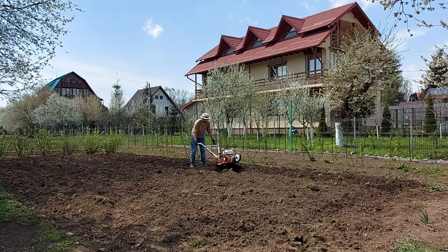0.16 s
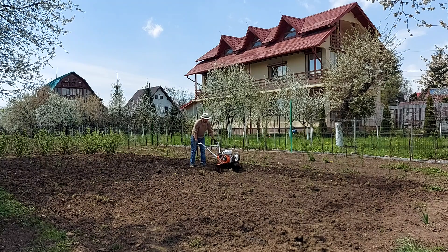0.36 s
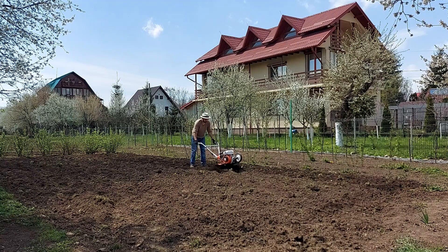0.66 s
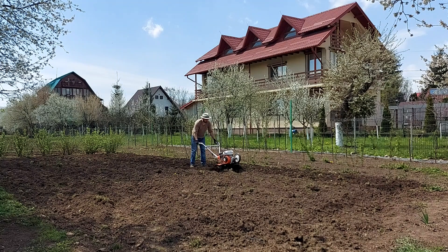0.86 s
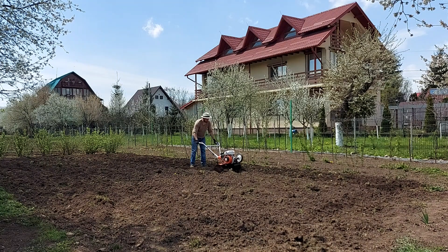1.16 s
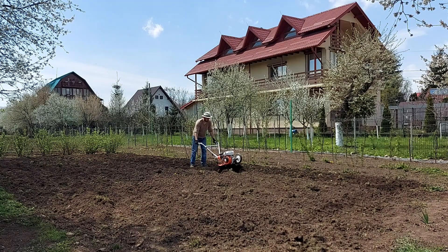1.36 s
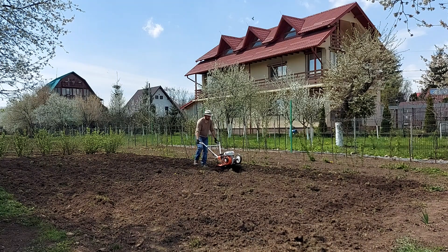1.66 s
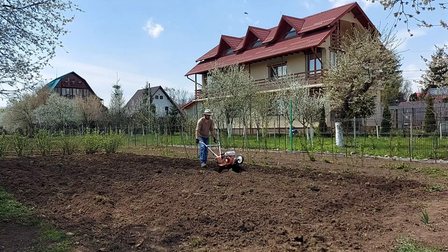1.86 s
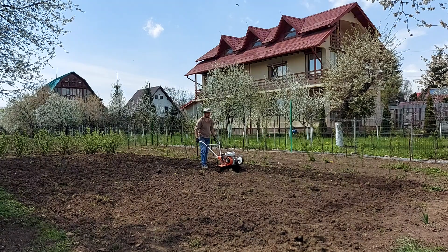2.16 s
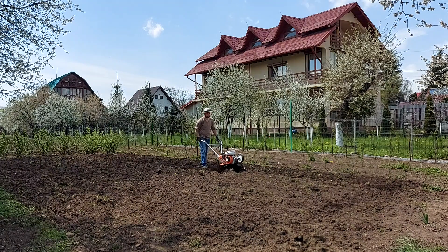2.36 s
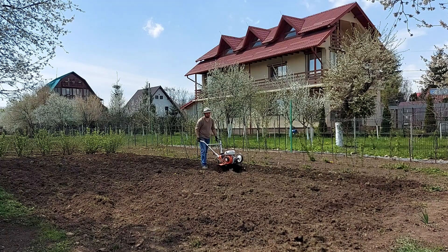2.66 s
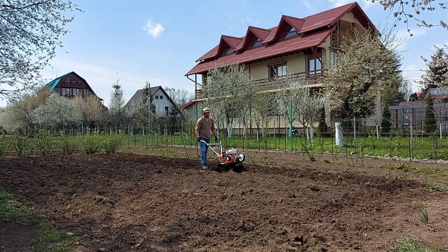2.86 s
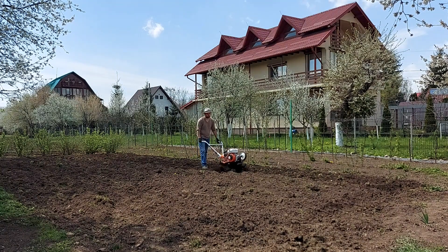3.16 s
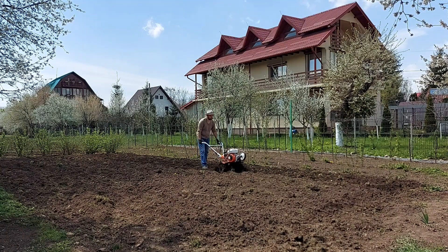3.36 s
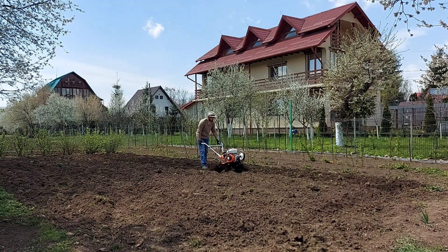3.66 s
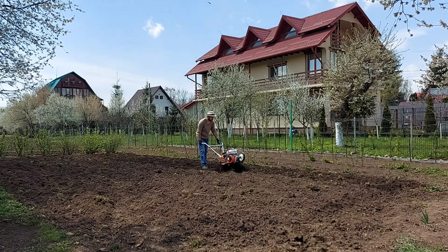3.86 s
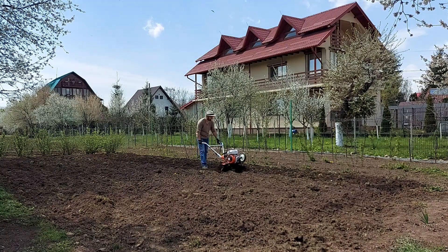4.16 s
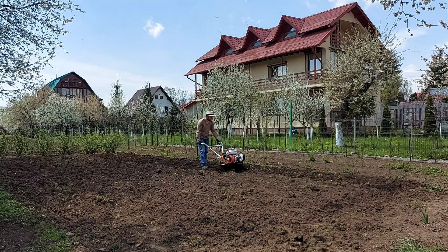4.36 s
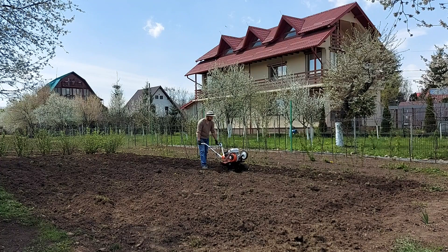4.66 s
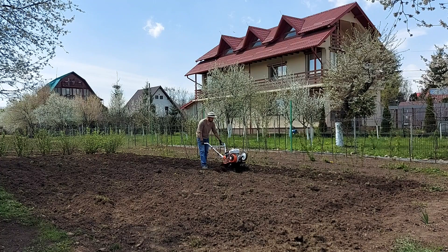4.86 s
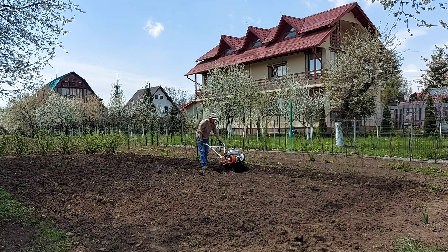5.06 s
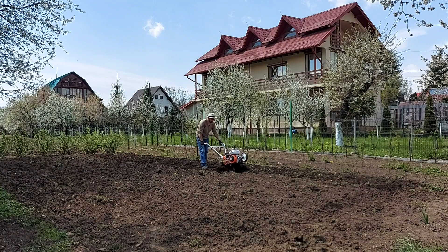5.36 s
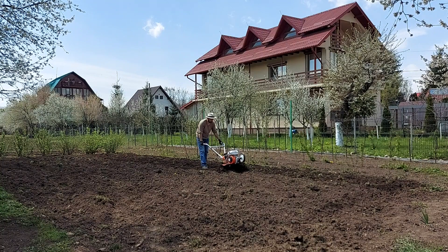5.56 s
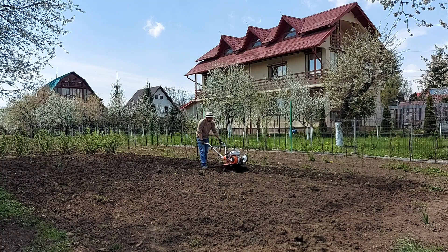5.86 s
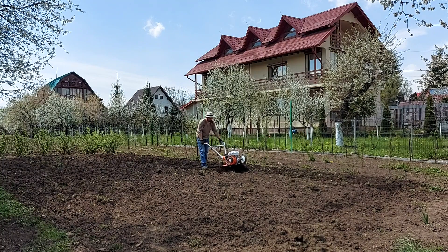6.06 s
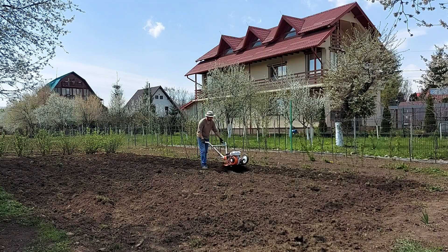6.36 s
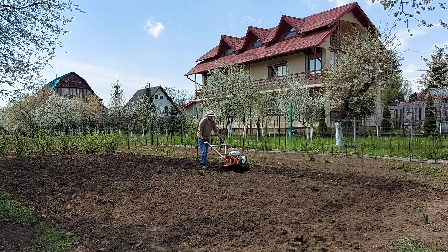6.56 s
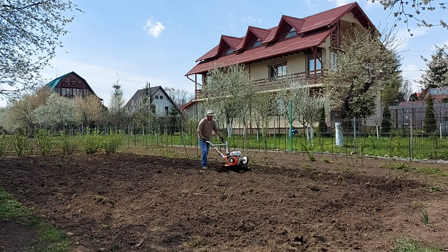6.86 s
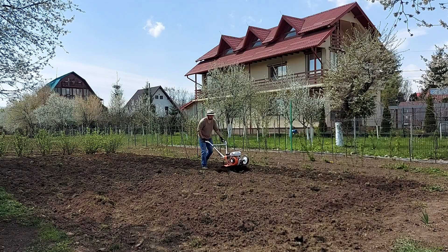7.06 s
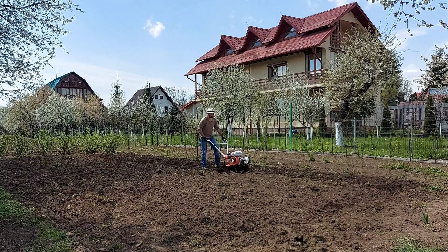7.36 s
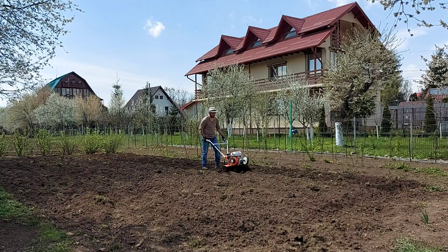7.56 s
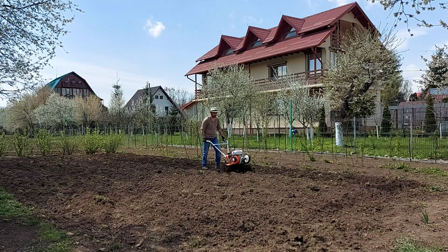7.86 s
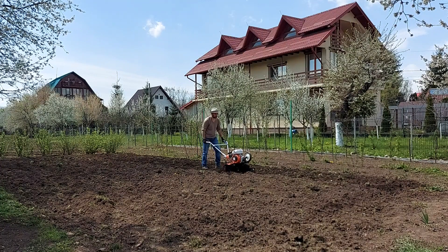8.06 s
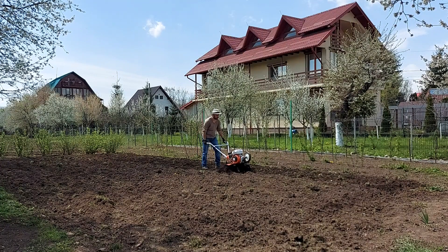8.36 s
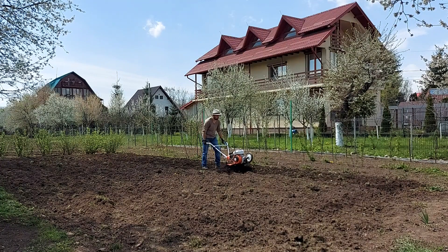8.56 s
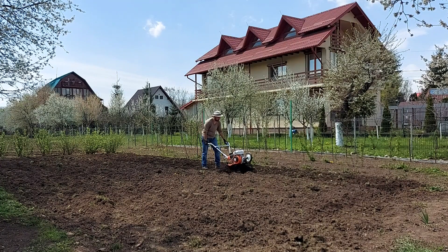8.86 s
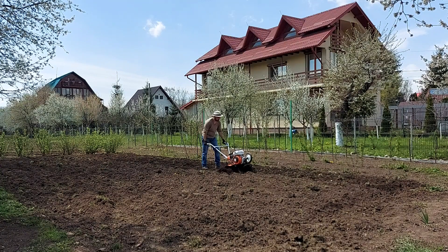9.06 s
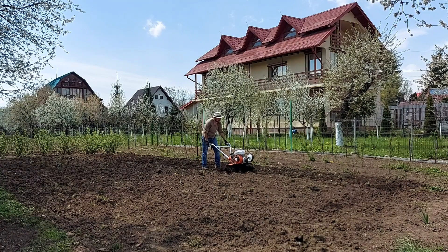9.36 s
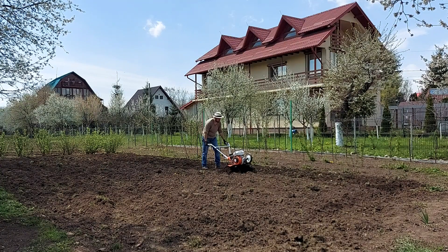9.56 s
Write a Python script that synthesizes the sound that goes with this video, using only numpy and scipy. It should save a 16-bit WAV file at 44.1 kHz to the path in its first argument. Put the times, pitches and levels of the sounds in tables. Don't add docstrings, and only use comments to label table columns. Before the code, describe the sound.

A single-cylinder petrol tiller works dry soil in an open garden, already running and never stopping. Its fast, buzzing exhaust beat sags and recovers slightly as the tines bite. Valve gear and thin panels clatter in time, while grit pings, stones knock and clods thump irregularly. The mono microphone stands some way off, with light wind rumble and a faint echo from a house front.

```python
import sys
import numpy as np
from scipy import signal
from scipy.fft import rfft, irfft, next_fast_len
from scipy.io import wavfile
from scipy.ndimage import uniform_filter1d, map_coordinates

SR = 44100
rng = np.random.default_rng(int(sys.argv[2]) if len(sys.argv) > 2 else 0)


def wav_record(signal):
    frames = np.transpose(np.atleast_2d(signal))
    bounded = np.clip(frames, -1, 1)
    quanta = np.round(bounded * 32767).astype(np.int16)
    wavfile.write(sys.argv[1], SR, quanta)


def to_linear_factor(level_db):
    exponent = np.asarray(level_db, float) / 20
    return 10 ** exponent


N = 428652
RATED_HZ = 26.85

# start_s, level_db
EFFORT = [(0.0, -36.5), (0.59, -36.5), (1.03, -35), (1.38, -35.5), (1.78, -38.5), (2.52, -37),
          (3.33, -36.5), (3.49, -37), (4.3, -37), (4.6, -36), (4.76, -37), (6.14, -37), (6.42, -38.5),
          (7.26, -36.5), (8.55, -37.5), (9.04, -36.5), (9.72, -37)]
CASING_BEATS = [
    (.08, 0.054, 0.94),
    (.31, 0.044, .4),
    (.53, 0.046, 0.69),
]
GEAR_BEATS = [
    (.21, 0.048, 0.72),
    (.33, 0.043, 0.81),
    (.49, 0.041, 0.58),
    (.88, 0.066, 0.18),
]


def engine():
    speed, _, cycle = crank()
    delayed_speed = np.roll(speed, round(.055 * SR))
    overspeed = np.clip(delayed_speed - RATED_HZ, -.25, 1.4)

    rattle_db = curves(EFFORT)[0]
    effort_db = rattle_db - rattle_db.mean()
    clatter_db = rattle_db + .5 * wobble(6)
    exhaust_db = -28.5 + 0.19 * wobble(4)
    casing_db = -28.5 + 0.5 * effort_db + .5 * wobble(5)
    sizzle_db = -51.5 + 1.5 * effort_db + 0.76 * wobble(5.4)

    gear = beats(cycle, GEAR_BEATS, scatter_db=3.5)
    thrust = beats(cycle, CASING_BEATS, scatter_db=1)
    beat = to_linear_factor(exhaust_db + 1.1) * exhaust(cycle, overspeed, speed - RATED_HZ, drift_db=0.6)
    body = chuff(cycle) + casing(thrust) + fins(gear, thrust)
    return beat + to_linear_factor(casing_db) * body + to_linear_factor(clatter_db) * clatter(gear) + to_linear_factor(sizzle_db) * sizzle(gear)


# start_s, speed_hz (firings per second)
CRUISE = [(0.0, 26.83), (1.62, 26.755), (3.24, 27.121), (4.86, 27.159), (6.48, 26.747), (8.1, 27.085),
          (9.72, 26.996)]
# start_s, speed_lost_hz
BITES = [(0.67, 0.49), (1.18, 0.63), (1.94, 0.84), (2.09, 1.06), (2.27, 1.31), (2.42, 0.42), (2.57, 1.28),
         (2.89, 1.24), (3.72, 0.31), (4.29, 0.96), (4.57, 1.55), (4.67, 0.87), (4.85, 1.59), (4.97, 0.52),
         (5.1, 0.49), (5.45, 0.34), (5.75, 0.64), (5.96, 0.45), (6.32, 0.31), (6.55, 0.64), (6.86, 0.5),
         (7.1, 0.46), (7.39, 1.01), (7.71, 0.84), (8.59, 0.26), (9.16, 0.7)]


def crank():
    hunt_hz, hunt_dies_s, start_cycle = 3.1, .4, .111
    t = np.arange(0, N + 64, 64) / SR
    bite_s, lost = np.transpose(BITES)
    since = np.maximum(t[:, None] - bite_s, 0)
    swings = -np.exp(-since / hunt_dies_s) * np.sin(2 * np.pi * hunt_hz * since)
    swing = np.interp(np.arange(N) / SR, t, swings @ lost)
    speed = curves(CRUISE)[0] + swing
    return speed, swing, start_cycle + np.cumsum(speed) / SR


# order (multiple of the firing rate), level_db
EXHAUST = [(1, -61), (2, -10), (3, -9), (4, -33), (5, 1), (6, -1.5), (7, -7), (8, -6), (9, -9), (10, -2),
           (11, -18.5), (12, -14), (13, -17), (14, -20), (15, -23.5), (16, -26), (17, -33), (18, -23),
           (19, -31), (20, -21), (21, -20.5), (22, -26), (23, -20), (24, -16.5), (25, -26), (26, -20)]
# order, change_db (per firing/s of overspeed)
GOVERNOR = [(7, -1.5), (8, -2.5), (9, 2.5), (10, -5.5), (11, -2), (12, 1.5), (13, -1.5), (15, -2)]
# order, change_db (per firing/s)
REVVING = [(2, 2), (3, 1.2), (5, 1.9), (6, 2), (7, .5), (8, -1.8), (9, -1), (14, -2)]
# order, lag_rad (per firing/s of overspeed)
THROTTLE_LAG = [(7, .35), (8, .25), (9, -.5), (10, .6), (11, -.5), (12, .25), (13, .3)]


def exhaust(cycle, overspeed, revs, drift_db):
    orders, levels = np.transpose(EXHAUST)
    orders = np.round(orders)
    pulses = 0
    for at, size in [(.163, .72), (.484, -.46), (.504, 1)]:
        pulses = pulses + size * np.exp(-2j * np.pi * orders * at)
    phases = np.angle(pulses) - 1.96 - 5.2 * np.log(orders / 5)
    throttle, rise, lag = dict(GOVERNOR), dict(REVVING), dict(THROTTLE_LAG)
    jitter_rad = .013
    tones = np.zeros(N)
    for k, db, phase in zip(orders, levels, phases):
        level_db = db + drift_db * wobble(7) + throttle.get(k, 0) * overspeed + rise.get(k, 0) * revs
        angle = 2 * np.pi * k * cycle + phase - lag.get(k, 0) * overspeed + jitter_rad * k * wobble(12)
        tones += to_linear_factor(level_db) * np.cos(angle)
    return unit(tones)


# pitch_hz, level_db (per Hz)
CHUFF = [(160, -9.5), (280, -10), (297, -1), (334, -18), (433, -16.5), (633, -8), (793, -10), (900, -7.5),
         (1170, -42), (1980, -120)]
CHUFF_BEATS = [
    (0.58, 0.037, 0.51),
    (0.38, 0.066, 0.29),
    (0.88, 0.016, 0.57),
]


def chuff(cycle):
    return to_linear_factor(-11.5) * rush(CHUFF, beats(cycle, CHUFF_BEATS, scatter_db=2.2), patchy_db=.8)


# pitch_hz, level_db (per Hz)
CASING = [(460, -33), (780, -14), (975, 3), (1100, -1), (1180, 1), (1450, -6), (1880, -28), (3190, -120)]


def casing(thrust):
    return to_linear_factor(-4) * rush(CASING, thrust, patchy_db=1.5, size=1024) + to_linear_factor(-7.0) * cowl(thrust)


# pitch_hz, width_hz, level_db
COWL = [(643, 24, -12), (973, 21, -3), (1018, 7.9, -3.5), (1055.4, 13, -3.5), (1183.5, 30, -5),
        (1277, 23, -7), (1540, 18, -4.5), (1790, 15, -4), (4155, 81, -9)]


def cowl(gate):
    m = next_fast_len(N)
    f = np.fft.rfftfreq(m, 1 / SR)
    shake = rfft(rng.standard_normal(N) * gate, m)
    rings = np.zeros(N)
    for hz, width, db in COWL:
        resonance = f * width / (hz * hz - f * f + 1j * f * width)
        swell_db = 1.6 * wobble(3.08)
        rings += to_linear_factor(db + swell_db) * unit(irfft(shake * resonance, m)[:N])
    return unit(rings)


# pitch_hz, level_db (per Hz)
FINS = [(820, -24), (1400, 0), (1830, -0.5), (2010, -3.5), (2490, -7.5), (2930, -19.5), (3300, -12),
        (4290, -36), (7260, -120)]


def fins(gear, thrust):
    return to_linear_factor(-4.0) * rush(FINS, gear ** 0.45 * thrust ** 0.29, patchy_db=1.2, size=1024)


# pitch_hz, level_db (per Hz)
CLATTER = [(1650, 1), (2800, -4.5), (3050, -13), (3580, 1.5), (4200, 1), (4780, -1.5), (6470, -1.5),
           (7640, -14.5), (8750, -4.5), (9360, -3.5), (11100, -11.5), (12200, -33.5), (15900, -49),
           (22000, -120)]


def clatter(gear):
    return to_linear_factor(1.5) * rush(CLATTER, gear, patchy_db=1.58, size=512)


# pitch_hz, level_db (per Hz)
SIZZLE = [(6590, -37), (11200, 2), (12100, -7), (14100, -2), (15100, -8.5), (16000, -18)]


def sizzle(gear):
    return to_linear_factor(2.5) * rush(SIZZLE, gear, patchy_db=1.5)


# start_s, peak_db, pitch_hz
PINGS = [(0.0373, -19, 10060), (1.9794, -24, 9200), (0.6669, -22, 10100), (1.0331, -22, 9020),
         (1.1209, -14.5, 9000), (1.3877, -13.5, 10000), (1.921, -21, 9700), (2.2253, -16, 10600),
         (3.1572, -23, 9400), (2.5701, -10.5, 10230), (2.6953, -13.5, 10100), (2.8749, -18, 9000),
         (3.0724, -20, 10100), (3.1901, -6, 9880), (3.4451, -20, 9700), (3.7459, -11, 9160),
         (3.8871, -14, 9760), (4.3216, -21.5, 9700), (4.6578, -17.5, 10100), (5.3358, -18.5, 9200),
         (5.6974, -21, 10600), (6.3325, -22, 9650), (6.5904, -22.5, 9200), (6.7835, -11.5, 9800),
         (6.8568, -11, 10450), (7.0988, -11, 10260), (7.419, -12.5, 9660), (7.683, -14, 10930),
         (8.8628, -21, 9600), (9.6435, -21.5, 10800)]
# start_s, peak_db
TINE_PINGS = [(0.5955, -22), (0.9328, -26), (2.5471, -18.5), (5.7708, -21.5), (6.2592, -26), (6.5755, -25),
              (8.6058, -25), (8.6667, -25), (9.0139, -22.5), (9.0493, -29), (9.088, -29), (8.829, -29),
              (9.1232, -27)]


def pings():
    tine_hz = 8710
    out = np.zeros(N + SR)
    t = np.arange(SR // 10) / SR
    skid = np.exp(-.5 * ((t - .004) / np.where(t < .004, .001, .0024)) ** 2)
    skid += to_linear_factor(-12 - 60 * t / .11) * (t > .004)
    hits = list(PINGS) + [(s, db, tine_hz) for s, db in TINE_PINGS] + fine_grit()
    for s, db, hz in hits:
        band = np.exp(-.5 * ((np.fft.rfftfreq(len(t), 1 / SR) - hz + 60) / 430) ** 2)
        scrape = irfft(rfft(rng.standard_normal(len(t))) * band) * skid
        ring_db = max(-8 - 6 * ((hz - 10850) / 250) ** 2, -21)
        ring = to_linear_factor(ring_db - 60 * t / 0.1) * (1 - np.exp(-t / 0.0032)) * np.sin(2 * np.pi * hz * t)
        start = max(round((s - .0035) * SR), 0)
        out[start:][:len(t)] += to_linear_factor(db - 0.6) * (scrape / abs(scrape).max() + ring)
    guard_band = [(6500, -30), (7900, 2), (8600, 0.5), (11300, -3), (12200, -14), (14000, -30)]  # Hz, dB
    out = coloured(out, guard_band)
    echo = to_linear_factor(-18) * np.roll(out, round(.02 * SR))
    return out[:N] + echo[:N]


def fine_grit():
    level_db, spread_db, low_hz, high_hz = -27, 2.5, 9200, 11200
    share, hunt_throws = .07, .3
    _, swing, cycle = crank()
    turn = np.arange(int(cycle[-1]) - 1)
    chance, side, size, pitch = rng.random((len(turn), 4)).T
    thrown_at = turn + np.where(side < .6, .12, .5) + .08 * pitch
    s = np.interp(thrown_at, cycle, np.arange(N) / SR)
    hunting = uniform_filter1d(abs(swing), size=SR // 3)[(s * SR).astype(int)]
    rows = np.c_[s, level_db + spread_db * (2 * size - 1), low_hz + (high_hz - low_hz) * pitch]
    return list(rows[chance < share + hunt_throws * hunting])


# start_s, peak_db
KNOCKS = [(0.128, -32), (0.6389, -44), (0.8155, -38), (0.8649, -42), (1.0849, -37), (1.308, -34),
          (2.0627, -41), (2.168, -35), (2.4763, -31.5), (2.6612, -31.5), (3.1911, -32), (3.258, -37),
          (3.8, -33), (3.9135, -38), (4.5329, -38), (4.657, -34), (4.8708, -37), (5.333, -34), (5.62, -34),
          (6.1504, -33), (6.8418, -35), (7.3572, -37), (7.42, -37), (7.8645, -33), (7.9024, -30),
          (7.9488, -31.5), (8.9276, -43)]
# start_s, strokes, peak_db
SLAPS = [(0.454, 2, -20), (0.5611, 1, -21), (0.7552, 1, -25), (1.16, 2, -16.5), (1.273, 2, -16.5),
         (1.4236, 2, -16), (2.0582, 1, -17), (2.4737, 1, -16), (2.6653, 1, -16), (2.9567, 2, -23),
         (3.0716, 1, -15), (3.292, 2, -17.5), (3.695, 1, -20), (3.8127, 1, -14.5), (4.3994, 1, -18),
         (4.7032, 1, -20), (4.7411, 1, -12.5), (5.0022, 3, -19), (5.298, 1, -19), (5.4415, 1, -19),
         (6.149, 1, -19), (6.2692, 1, -14), (6.7161, 2, -17.5), (7.01, 1, -15), (7.421, 2, -28),
         (7.6804, 1, -24), (7.864, 2, -26), (9.3536, 1, -24)]
# start_s, peak_db
CLUNKS = [(1.0415, -6), (1.9789, -15), (2.2817, -23), (2.6928, -9), (3.03, -13), (4.3964, -12),
          (4.7318, -4.5), (4.769, -10), (6.106, -4), (6.2185, -9.5), (6.555, -10), (6.5929, -6),
          (7.006, -8), (7.3048, -14), (7.5662, -10), (8.794, -7)]


def knocks():
    stones = rasps(KNOCKS, SIZZLE, gain_db=9.0, t60=.11) + rasps(KNOCKS, CLATTER, gain_db=12.5, t60=0.13)
    shut = [(s + k / RATED_HZ, db) for s, strokes, db in SLAPS for k in range(round(strokes))]
    slaps = rasps(shut, CLATTER, gain_db=1.5, t60=0.042) + rasps(shut, SIZZLE, gain_db=-22, t60=.04)
    clods = rasps(CLUNKS, CASING, gain_db=2.0, t60=0.09)
    return stones + slaps + clods


def rasps(events, spectrum, gain_db, t60):
    out = np.zeros(N + SR)
    t = np.arange(SR // 20) / SR
    for s, db in events:
        envelope = to_linear_factor(db + gain_db - 60 * t / t60) * (1 - np.exp(-t / .003))
        out[round(s * SR):][:len(t)] += rng.standard_normal(len(t)) * envelope
    return coloured(out[:N], spectrum)


# pitch_hz, level_db (per Hz)
BUFFET = [(25, -34), (40, -18.5), (55, -11), (90, -15), (125, -22), (300, -26.5), (420, -40)]
# start_s (of the peak), peak_db, fall_s
GUSTS = [(0.16, -37, .04), (0.6, -33, .25), (1.1, -34, .2), (1.4, -31, .12), (1.78, -33, .1),
         (2.11, -20, .05), (2.43, -28, .08), (2.92, -29, .12), (3.1, -22.5, .15), (3.6, -36, .1),
         (3.93, -28, .07), (4.45, -31, .2), (4.8, -26, 0.11), (5.06, -34, .07), (5.79, -30, .07),
         (5.97, -25, .04), (6.7, -36, 0.33), (7.13, -24, .08), (7.55, -28, .2), (7.92, -29, .08),
         (8.1, -33, .1), (8.33, -25, .11), (9.31, -32, .06)]


def wind():
    lull_db = -38.5
    t = np.arange(0, N + 64, 64) / SR
    peak_s, db, fall_s = np.transpose(GUSTS)
    gusts = np.exp(-abs(t[:, None] - peak_s) / fall_s) @ to_linear_factor(db)
    strength = to_linear_factor(lull_db) + np.interp(np.arange(N) / SR, t, gusts)
    return strength * to_linear_factor(-9.5) * rush(BUFFET, to_linear_factor(1.1 * wobble(8)), patchy_db=2.5)


def beats(cycle, table, scatter_db):
    gate = np.ones(N)
    for at, width, strength in table:
        turn = np.round(cycle - at)
        scatter = to_linear_factor(scatter_db * np.clip(rng.standard_normal(400), -2, 1.4))
        size = scatter[turn.astype(int) + 1]
        away = (cycle - at - turn) / width
        gate += strength * size * np.exp(-.5 * (away * np.where(away < 0, 1.6, .8)) ** 2)
    return gate


def rush(spectrum, gate, patchy_db, size=256):
    z = signal.stft(rng.standard_normal(N), nperseg=size)[2]
    field = uniform_filter1d(rng.standard_normal(z.shape), size=3, axis=0)
    field = uniform_filter1d(field, size=3072 // size + 2, axis=1)
    noise = signal.istft(z * to_linear_factor(patchy_db * unit(field)), nperseg=size)[1][:N]
    return unit(coloured(gate * noise, spectrum))


def coloured(x, spectrum):
    m = next_fast_len(len(x) + 8192)
    hz, db = np.transpose(spectrum)
    log_f = np.log(np.fft.rfftfreq(m, 1 / SR) + 1)
    gain = to_linear_factor(np.interp(log_f, np.log(hz), db, left=-120, right=-120))
    return irfft(rfft(x, m) * gain, m)[:len(x)]


def wobble(rate):
    coarse = np.arange(0, N + 64, 64)
    knots = rng.standard_normal(int(N * rate / SR) + 4)
    return np.interp(np.arange(N), coarse, map_coordinates(knots, [coarse * rate / SR]))


def curves(rows):
    s, *cols = np.transpose(rows)
    return [np.interp(np.arange(N) / SR, s, c) for c in cols]


def unit(x):
    return x / np.sqrt(np.mean(x ** 2) + 1e-20)


def scene():
    return (engine() + pings() + knocks() + wind())[None]


def band_limit(x):
    return signal.sosfilt(signal.butter(12, 16120, fs=SR, output="sos"), x)


def record(dry):
    limited = coloured(dry[0], [(10, 0), (15800, 0), (15950, -80)])[None]
    return band_limit(limited)


dry = scene()
out = record(dry)
wav_record(out)
```